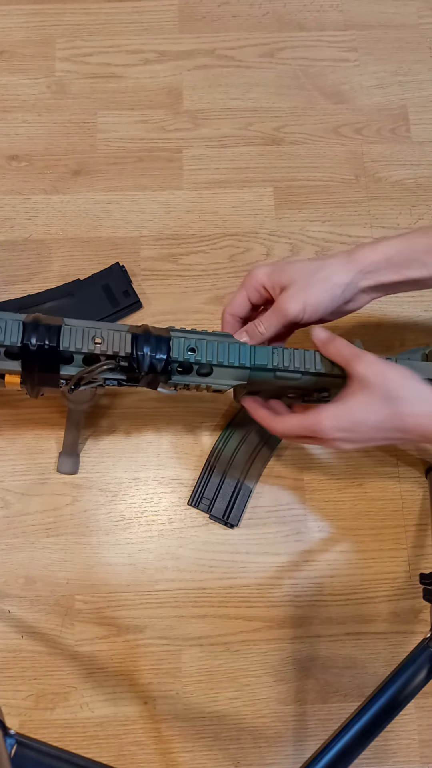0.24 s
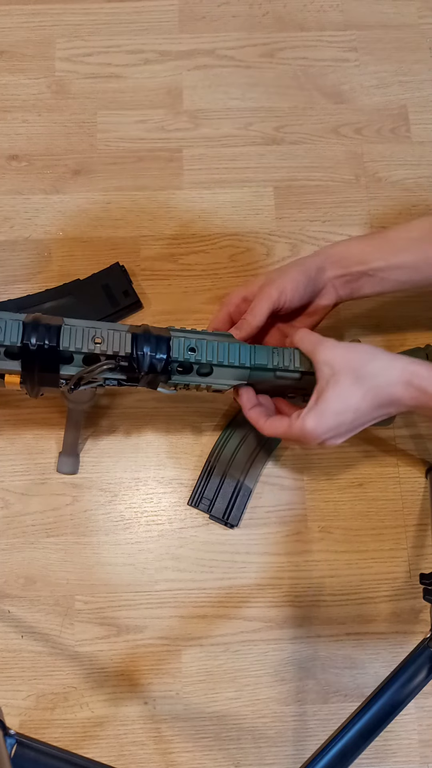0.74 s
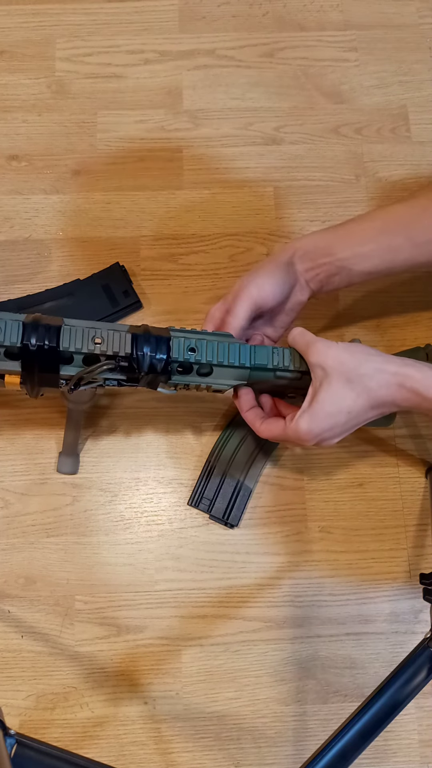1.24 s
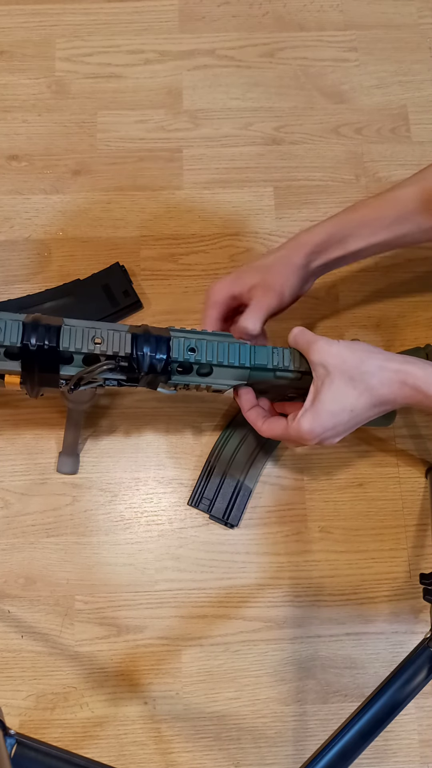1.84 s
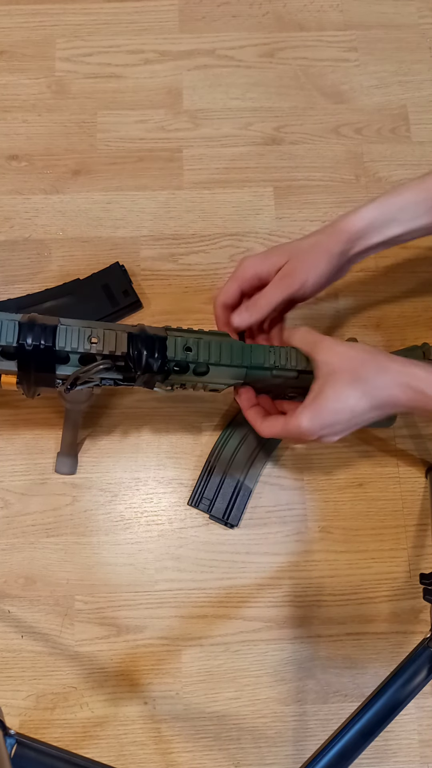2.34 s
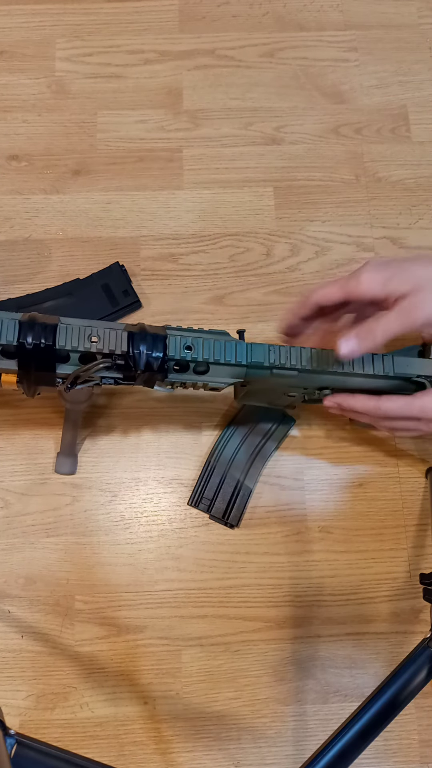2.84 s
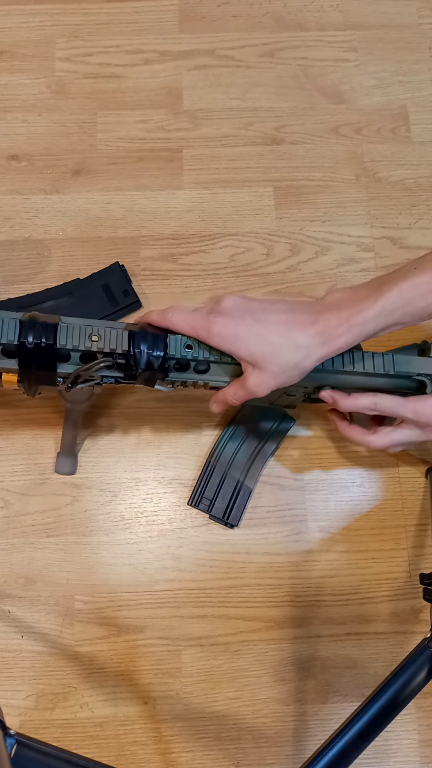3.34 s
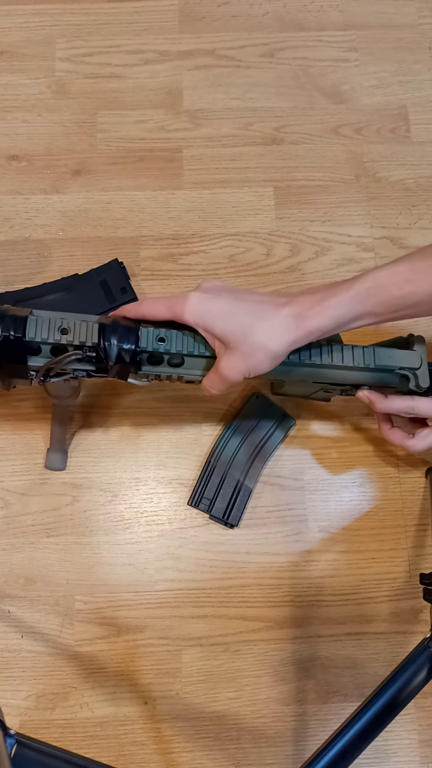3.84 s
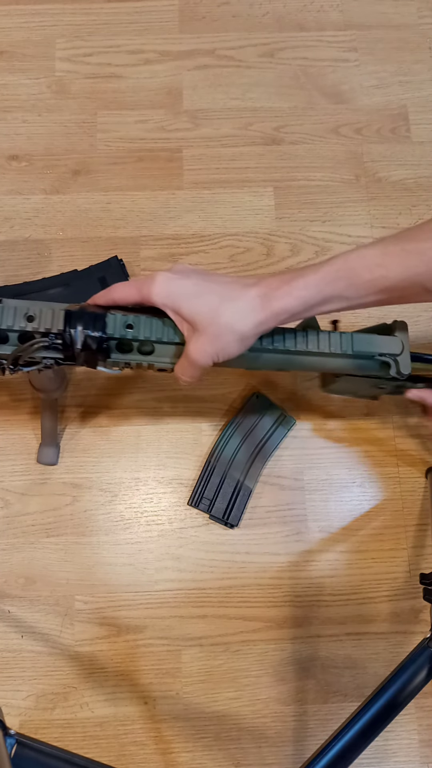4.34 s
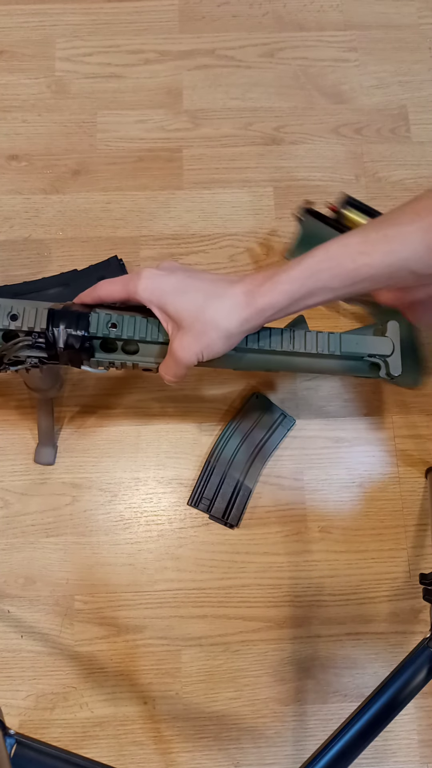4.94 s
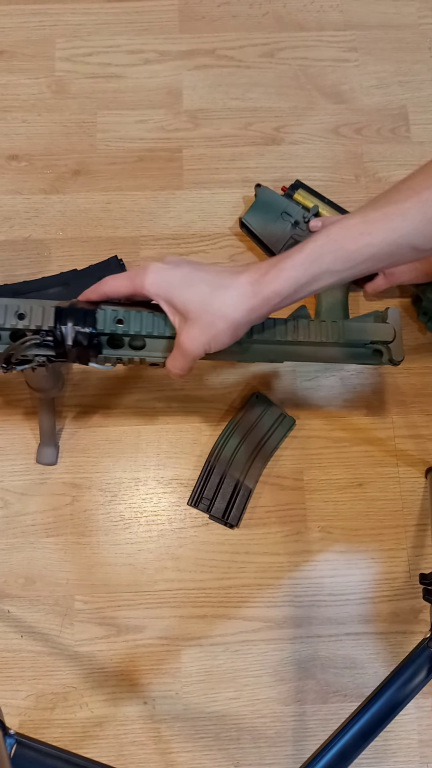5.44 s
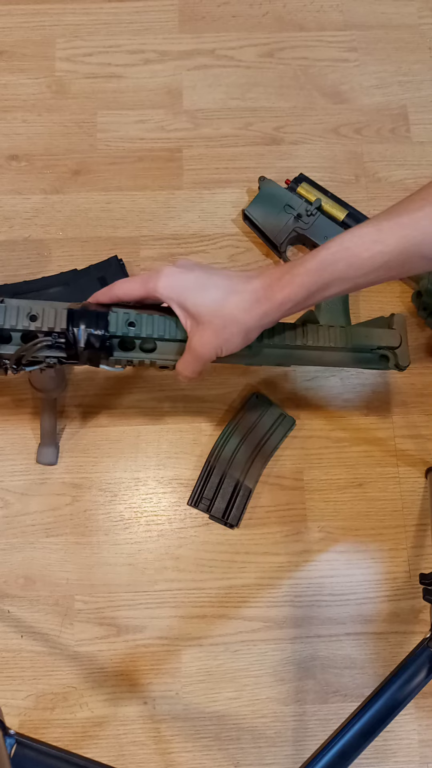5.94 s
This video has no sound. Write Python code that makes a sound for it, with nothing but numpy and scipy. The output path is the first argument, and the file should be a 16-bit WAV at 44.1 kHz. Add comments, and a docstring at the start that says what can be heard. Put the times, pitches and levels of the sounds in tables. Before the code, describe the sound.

Close in a small, hard room, hands work a hollow plastic and metal toy rifle. Soft brushing comes first, then sharp latch clicks with quiet gaps between them. Loose parts rattle as the halves slide, and the second half grows busier and louder with solid floor thumps, short drags and hard clacks. Short bright reflections follow each hit over faint hiss.

```python
"""Pins and latches click in the hollow body of a plastic and metal toy rifle as hands pull it apart.
Each click is a burst of noise that also makes the body ring. Loose parts rattle as smaller clicks.
Parts thump on a laminate floor (a push rings the boards) and drag over it (many tiny slips do the same);
skin and sleeve brush the plastic as shaped noise. A small hard room adds echoes and a short bright tail.
Behind it all lie a faint hiss and a wavering low hum."""
import sys
import numpy as np
from scipy import signal
from scipy.fft import rfft, irfft
from scipy.io import wavfile
from scipy.ndimage import uniform_filter1d

SR = 44100
rng = np.random.default_rng(int(sys.argv[2]) if len(sys.argv) > 2 else 0)


def int16_out(signal):
    """Quantize to a 16-bit WAV file."""
    q = np.round(np.clip(np.atleast_2d(signal).T, -1, 1) * 32767)
    wavfile.write(sys.argv[1], SR, q.astype(np.int16))


N = 273446  # length in samples

# background hiss, shape of its spectrum: f/Hz, level per Hz/dB
HISS_SPECTRUM = [(35, -80), (60, -13.5), (161, -16), (229, -2), (270, -6), (485, -9), (723, -13.5),
                 (1760, -10), (2030, -13), (2630, -17), (4950, -16.5), (5440, -11), (9780, -34.5),
                 (14900, -26.5), (16400, -45.5)]
HISS_DB = -70.5
HUM_HZ, HUM_DB = 120, -85.5

# room tail, time to fall 60 dB at its first rate of fall: f/Hz, time/s
ROOM_DECAY = [(150, 0.31), (400, 0.5), (1000, 0.43), (2500, 0.47), (5000, 0.53), (9000, 0.31),
              (15000, 0.23)]
# single echoes from the floor and nearest walls: delay/s, level/dB
ECHOES = [(.0056, -10.5), (.0125, -23.5), (0.017, -26.5), (.023, -18.5)]
ROOM_TAIL_DB = -2

# skin and sleeve brushing plastic: start t/s, full t/s, easing t/s, end t/s, level/dB
BRUSH_STROKES = [(0, .24, 0.24, 0.53, -56.5), (1.05, 1.19, 1.23, 1.2, -72), (2.4, 2.55, 3.23, 2.75, -69),
                 (4.11, 4.16, 2.8, 4.2, -54), (4.79, 4.86, 5, 5.11, -65), (5.285, 5.3, 5.4, 5.44, -61),
                 (5.86, 5.9, 5.52, 6.15, -59)]
# brushing noise, shape of its spectrum: f/Hz, level per Hz/dB
BRUSH_SPECTRUM = [(470, -34.5), (800, -1), (884, -15.5), (1040, -31), (1240, -16), (2070, -12), (4240, 1),
                  (8660, -11.5), (10200, -27.5), (15000, -16), (16000, -36)]
STROKE_EDGE_DB = -20  # a stroke starts and ends this far under its full pressure

# ways the floorboards ring: f/Hz, level/dB, time to fall 60 dB/s
BOARD_MODES = [(190, -23, 0.013), (245, 8.5, 0.11), (323.4, 12, 0.037), (375.6, 3, 0.055), (457, 12, 0.02),
               (602, 0, 0.047), (670, -26, 0.018), (847, 0.5, 0.017), (1100, 3, 0.01), (1485, -0.5, 0.0063),
               (2120, -29, .01)]
DEEP_HZ = 280  # board modes below it need a heavy part
# parts dragged over the boards: start t/s, full t/s, easing t/s, end t/s, level/dB,
# length of a slip/ms, lean toward the deep modes/dB per octave
DRAG_STROKES = [(0.17, 0.214, 0.25, 0.38, -51.5, 0.68, -9.5), (1.343, 1.36, 1.37, 1.49, -52.5, 2.3, 24),
                (2.087, 2.124, 2.03, 2.264, -37, 1.3, 8.5), (2.4, 2.6, 2.77, 2.8, -70, 1.8, 4),
                (2.903, 2.94, 2.88, 3.013, -40, 0.9, 0), (3.4, 3.694, 3.8, 3.97, -48, 1.1, 2),
                (3.985, 4.09, 5.3, 4.62, -49.5, 1.7, -1), (4.656, 4.775, 4.86, 4.88, -40.5, 0.65, -1),
                (4.887, 4.932, 4.9, 5.144, -40, .9, -3), (5.096, 5.136, 4.86, 5.26, -54.5, 1.6, 10.5),
                (5.4, 5.474, 6.2, 5.6, -48.5, .9, -8), (5.77, 5.777, 5.9, 5.803, -30.5, 1.3, 12)]
# parts landing on the floor: t/s, peak level of the ring/dB, contact time/ms, weight on the deep modes/dB
LANDINGS = [(1.343, -37.5, 1.2, 3), (1.46, -42, 1.1, 7), (1.531, -49, 1.03, 6), (2.111, -32, 1.5, -1),
            (2.425, -47, 0.71, 3), (2.921, -27, 1.55, -20), (3.352, -37, 1.73, -3), (3.537, -49, 1.1, -9),
            (3.585, -29, 0.98, -12), (3.618, -35, 2, 25), (3.665, -37, 0.86, -22), (3.737, -54, 0.68, -19),
            (3.772, -33, 1.4, -2), (4.083, -43, 0.9, -41), (4.089, -43, 1.3, -13), (4.224, -37, 0.81, 7),
            (4.266, -20.5, 1.06, -3), (4.407, -17.5, 0.71, -0.5), (4.553, -38.5, 0.86, 12),
            (4.617, -6.5, 1.5, -6), (4.764, -30, 0.73, 3), (4.942, -25.5, 1.45, -3),
            (4.969, -25, 1.64, -11.5), (4.989, -25.5, 1.9, -5.5), (5.29, -36, 3.4, 7.5),
            (5.33, -17, 0.7, 2), (5.405, -21.5, 0.62, 10), (5.536, -20, 1.2, -7), (5.675, -25, 1.5, 4),
            (5.776, -12.5, 1.22, -0.5), (6.161, -57, 0.56, -23)]
SLAP_DB = -7  # puff of air under a landing part, against its ring

# loose parts shaken while the halves slide: start t/s, end t/s, level/dB
SHAKES = [(3.599, 3.86, -41), (4.169, 4.292, -52)]
RATTLE_PER_S = 60
RATTLE_SHELL_DB, RATTLE_RING_DB = 0, 3.5
RATTLE_SPREAD_DB = 5  # levels vary up to this far either way

# pins, latches and loose parts: t/s, level/dB, share of the hollow shell/dB, brightness/dB per octave,
# pitch of the struck spot f/Hz, its ring against the crack/dB
CONTACTS = [(0.496, -54, -41, 5.5, 1310, 0), (1.32, -51, -29, -1, 1760, 3), (1.3385, -25, -8, -18, 1170, 0),
            (1.341, -19, -19, 10.5, 4270, -1.5), (1.3435, -25.5, -7, -9.5, 1710, -1.5),
            (1.535, -33, -10, 2.5, 1710, -1), (1.537, -35, -19, 2, 3050, -4),
            (1.891, -41, -17.5, -0.5, 1750, 8.5), (1.894, -56.5, -13, 2, 1280, 3),
            (2.088, -38, 15.5, 2.5, 1700, -7), (2.095, -27, -13, 0.5, 1818, 2),
            (2.112, -14.5, -11.5, 6.5, 3800, -3), (2.115, -17.5, -22, 5.5, 4450, 2.5),
            (2.889, -46.5, -14, 6, 4010, 4), (2.916, -44.5, -8, 0, 3700, -26),
            (2.997, -29, -21, 8, 2960, -26), (3.136, -39.5, -15.5, 11, 2090, -7),
            (3.354, -40.5, -25, -4.5, 1910, -17), (3.369, -41, -2, 14, 3170, -11),
            (3.477, -48.5, 10, 9, 1170, 1), (3.548, -41.5, -13, 0, 1920, -6),
            (3.594, -24, -1.5, -1.5, 1980, -3.5), (3.617, -25, -0.5, 3.5, 1210, -6),
            (3.666, -28, -14, 5.5, 2470, -15), (3.69, -32.5, -11, -6, 1030, 5),
            (3.735, -30.5, -26, 2, 1170, -1.5), (3.772, -28.5, -6, 6, 1480, 4),
            (3.828, -42, -13, -26, 1460, -28), (4.029, -57, -10, -12, 1820, 12),
            (4.165, -37, -12, -6, 1800, -5.5), (4.3, -24.5, -37, 6, 1855, -2),
            (4.444, -33, -6, -1.5, 1210, -4), (4.487, -51, -19, 5.5, 3200, -4),
            (4.619, -14, 9, -4, 1275, -13), (4.633, -26, -9.5, 6, 4000, -2),
            (4.642, -31, 0.5, -9, 940, -12), (5.293, -12, -14, 2, 869, -3),
            (5.298, -13.5, 6.5, -8.5, 3020, 7), (5.333, -15, 4.5, -0.5, 1820, -17.5),
            (5.337, -15.5, 1.5, -2, 4300, 13.5), (5.408, -21, -10, -4.5, 1690, -11),
            (5.537, -31.5, 2, -4, 1040, -6), (5.588, -29.5, -5, 0, 3870, 0),
            (5.631, -18.5, -4, 5, 920, -10), (5.677, -28.5, -18.5, -4.5, 842, -1),
            (5.754, -30, -1, 1.5, 1940, -1), (5.778, -30.5, -18, 5.5, 3670, -10),
            (5.793, -22, -3, 0.5, 1690, -20)]
# ways the rifle's hollow receiver rings: f/Hz, level/dB, time to fall 60 dB/s
RECEIVER_MODES = [(860, 0, .025), (1040, 0, .025), (1170, 0, .025), (1300, 0, .03), (1480, 0, .025),
                  (1700, 0, .02), (1900, 0, .02), (2200, 0, .015), (2420, 0, .015), (2950, 0, .015),
                  (3160, 0, .012), (3700, 0, .01), (4040, 0, .018), (4370, 0, .01), (4550, 0, .01),
                  (5300, 0, .008), (5950, 0, .006)]
# pitch zones of a crack (shell, wall, rail, pin, edge): f/Hz
ZONE_HZ = [1000, 1900, 3800, 7200, 13000]
# share of each zone in a plain crack: level/dB
ZONE_SHARES = [0.5, 1, -8.5, -14, -39]
# ripples common to every crack: f/Hz, level/dB
CRACK_RIPPLES = [(300, -14.5), (600, -4), (1000, 0.5), (2000, -3.5), (2650, -2.5), (4000, 1), (5800, -1),
                 (6400, -8), (7200, -4.5), (8000, -4.5), (8800, 2.5), (10000, -10.5), (11000, -2),
                 (16000, 2.5)]
# time scale of the chatter at -20 dB, and its change per dB: harder contacts are over sooner
CHATTER_MS, CHATTER_MS_PER_DB = 2.88, -0.09

EDGE_HZ = 15900  # upper edge of the sound


def gain_of(db):
    """Turns decibels into a gain."""
    return 10 ** (np.asarray(db) / 20)


def evened(x):
    """Scales a signal to an rms (average strength) of 1."""
    return x / np.sqrt(np.mean(x ** 2) + 1e-20)


def read(points, hz):
    """Reads between the points of a table, on a log-frequency axis."""
    f, value = np.transpose(points)
    return np.interp(np.log(hz + 1), np.log(f + 1), value)


def add(mix, s, sound):
    """Mixes a sound in at s seconds, cutting what runs past the end."""
    part = mix[round(s * SR):][:len(sound)]
    part += sound[:len(part)]


def ring(modes, shares_db, size=3000):
    """A struck object rings as a sum of sines, one a mode, each dying at its own pace."""
    t = np.arange(size) / SR
    hz, db, t60 = np.transpose(modes)[:, :, None]
    fading = gain_of(db + shares_db[:, None] - 60 * t / t60)
    return (fading * np.sin(2 * np.pi * hz * t)).sum(0)


def coloured(spectrum, patchy_db, size):
    """Noise of a given spectrum, with louder and softer patches that drift over time and pitch."""
    frames, hz = 4 * N // size + 5, np.fft.rfftfreq(size, 1 / SR)
    real, imaginary, patches = rng.standard_normal((frames, len(hz), 3)).T
    patches = uniform_filter1d(patches, size // 100, 0)  # smooth over pitch
    patches = evened(uniform_filter1d(patches, 10000 // size, 1))  # smooth over time
    level_db = read(spectrum, hz)[:, None] + patchy_db * patches
    frames_of_noise = (real + 1j * imaginary) * gain_of(level_db)
    noise = signal.istft(frames_of_noise, nperseg=size, noverlap=3 * size // 4)[1]
    return evened(noise[:N])


def strokes(rows):
    """Gain of the strokes: pressure builds and lets go, with silence between strokes."""
    t, gain = np.arange(N) / SR, np.zeros(N)
    for start, full, ease, end, db, *_ in rows:
        fade = np.clip(np.minimum(t - start, end - t) / 0.015, 0, 1)
        # an easing time out of order can make the pressure jump
        pressure_db = np.interp(t, [start, full, ease, end], [STROKE_EDGE_DB, 0, 0, STROKE_EDGE_DB])
        gain += gain_of(db + pressure_db) * fade
    return gain


def causal(gain_db):
    """Shortest response with the given gain on an even frequency grid, never starting early."""
    mirrored = np.concatenate([gain_db, gain_db[-2:0:-1]])
    log_gain = np.log(gain_of(mirrored))
    phase = -signal.hilbert(log_gain).imag
    return np.fft.ifft(np.exp(log_gain + 1j * phase)).real[:len(gain_db)]


def hiss_and_hum():
    """Shaped noise makes the faint hiss; a sine wavering in level and phase makes the low hum."""
    t = np.arange(N) / SR
    waver = evened(uniform_filter1d(rng.standard_normal(N), 2500))
    hum = gain_of(HUM_DB + 3.5 * waver) * np.sin(2 * np.pi * HUM_HZ * t + .4 * waver)
    return gain_of(HISS_DB) * coloured(HISS_SPECTRUM, patchy_db=2.4, size=2048) + hum


def room(x):
    """A few single echoes, then a scattered tail that fades band by band and steepens."""
    taps = np.zeros((3, SR // 2 + 40))
    slots = np.arange(300, SR // 2, 16)
    at = slots + rng.integers(0, 16, (3, len(slots)))  # one tap at chance in every 16 samples
    np.put_along_axis(taps, at, rng.choice([-1., 1.], at.shape), 1)
    hz, t, z = signal.stft(taps, SR, nperseg=256)
    decay_db = -60 * t / read(ROOM_DECAY, hz)[:, None] - 87 * t ** 2
    tails = signal.istft(z * gain_of(decay_db), SR, nperseg=256)[1]
    tails *= gain_of(ROOM_TAIL_DB) / np.linalg.norm(tails[0])
    # three tails take turns at a steady 2.5 rounds a second
    turn = 2 * np.pi * (2.5 * np.arange(N) / SR + np.arange(3)[:, None] / 3)
    feeds = x * np.sqrt(2 / 3) * np.cos(turn)
    wet = signal.fftconvolve(feeds, tails, axes=1)[:, :N].sum(0)
    for s, db in ECHOES:
        add(wet, s, gain_of(db) * x)
    return wet


def brushes():
    """Skin and sleeve rub the plastic: patchy noise that follows the pressure of each stroke."""
    return strokes(BRUSH_STROKES) * coloured(BRUSH_SPECTRUM, patchy_db=3.0, size=512)


def drags(slips_per_s=3000):
    """Uneven slips knock the boards; long slips leave the upper modes asleep, light parts the deep ones."""
    sizes = gain_of(2.5 * rng.exponential(1, N))
    slips = rng.standard_normal(N) * sizes * (rng.random(N) < slips_per_s / SR)
    start, *_, slip_ms, weight_db = np.transpose(DRAG_STROKES)
    now = np.maximum(np.searchsorted(start, np.arange(N) / SR) - 1, 0)  # row of the latest drag
    slip_s, out = slip_ms[now] / 1000, np.zeros(N)
    for mode in BOARD_MODES:
        hz = mode[0]
        knocks = signal.oaconvolve(slips, ring([mode], np.zeros(1)))[:N]
        lean = gain_of(weight_db[now] * np.log2(DEEP_HZ / hz))
        out += knocks / (1 + (hz * slip_s) ** 2) * lean
    # the drags are kept thin in the bass
    out = signal.sosfilt(signal.butter(2, 230, "high", fs=SR, output="sos"), out)
    # steady pressure: slips share out the effort
    out /= np.sqrt(uniform_filter1d(out ** 2, 3000) + 1e-12)
    return strokes(DRAG_STROKES) * out


def thumps():
    """One push into the boards makes them ring; a short hard contact wakes the upper modes too."""
    out, t = np.zeros(N), np.arange(400) / SR
    deep = np.transpose(BOARD_MODES)[0] < DEEP_HZ
    chance = rng.standard_normal((len(LANDINGS), len(BOARD_MODES)))
    for (s, db, ms, weight_db), luck in zip(LANDINGS, chance):
        push = np.sin(np.pi * np.clip(t / (max(ms, .1) / 1000), 0, 1)) ** 2
        boards = ring(BOARD_MODES, weight_db * deep + 4.5 * luck, size=4500)
        sound = signal.fftconvolve(push, boards)
        sound /= abs(sound).max()
        slap = np.gradient(push)  # air squeezed out, then drawn back
        add(sound, 0, gain_of(SLAP_DB) * slap / slap.max())
        add(out, s + .0015, gain_of(db) * sound)  # starts 1.5 ms after the listed time
    return out


def rattles():
    """Loose parts touch at chance moments and chance spots: rows like those of the contacts."""
    rows = []
    for start, end, db in SHAKES:
        moments = start + np.cumsum(rng.exponential(1 / RATTLE_PER_S, size=40))
        for s, (size, spot) in zip(moments, rng.random((40, 2))):
            if s < end:
                level_db = db + RATTLE_SPREAD_DB * (2 * size - 1)
                spot_hz = 900 * 5 ** spot
                rows.append((s, level_db, RATTLE_SHELL_DB, 0, spot_hz, RATTLE_RING_DB))
    return rows


def clicks(rows):
    """A contact chatters briefly: a wide crack, and receiver modes near the struck spot ring on."""
    out, t = np.zeros(N), np.arange(1024) / SR
    mode_hz, grid = np.transpose(RECEIVER_MODES)[0], np.fft.rfftfreq(1024, 1 / SR)
    octaves = np.log2(np.divide(ZONE_HZ[1:], ZONE_HZ[2]))  # brightness pivots on the rail zone
    chance = rng.standard_normal((len(rows), 1024))
    for (s, db, shell_db, bright_db, spot_hz, ring_db), draw in zip(rows, chance):
        u = t / (max(CHATTER_MS + CHATTER_MS_PER_DB * (db + 20), .2) / 1000)
        z = rfft(draw * u * np.exp(-2.5 * u), 2048)
        # each chatter's spectrum is evened out, so the crack's own colour sets its tone
        chatter = irfft(z / np.sqrt(uniform_filter1d(abs(z) ** 2, size=25)))[:1024]
        shares = np.add(ZONE_SHARES, [shell_db, *(bright_db * octaves)])
        crack = causal(read(list(zip(ZONE_HZ, shares)), grid) + read(CRACK_RIPPLES, grid))
        # 3 dB weaker at 0.06 octave from the struck spot
        near = ring(RECEIVER_MODES, -3 * (np.log2(mode_hz / spot_hz) / .06) ** 2)
        body = gain_of(ring_db) * near / np.linalg.norm(near)
        add(body, 0, crack / np.linalg.norm(crack))
        sound = signal.fftconvolve(chatter, body)
        loudest = np.sqrt(2 * uniform_filter1d(sound ** 2, 60).max())
        add(out, s - .0005, gain_of(db) * sound / loudest)  # starts 0.5 ms before the listed time
    return out


def scene():
    """All handling noise shares one room, which the boards feed less; a small microphone loses deep bass."""
    rifle = clicks(CONTACTS) + clicks(rattles()) + brushes()
    boards = thumps() + drags()
    heard = rifle + boards + room(rifle + gain_of(-6) * boards)
    thin = signal.sosfilt(signal.butter(5, 155, "high", fs=SR, output="sos"), heard)
    return (thin + hiss_and_hum())[None]


def record(dry):
    """Cuts off the treble above the band edge."""
    band_limit = signal.firwin(511, EDGE_HZ, window=("kaiser", 9), fs=SR)
    return signal.oaconvolve(dry, band_limit[None], "same")


dry = scene()
out = record(dry)
int16_out(out)
```